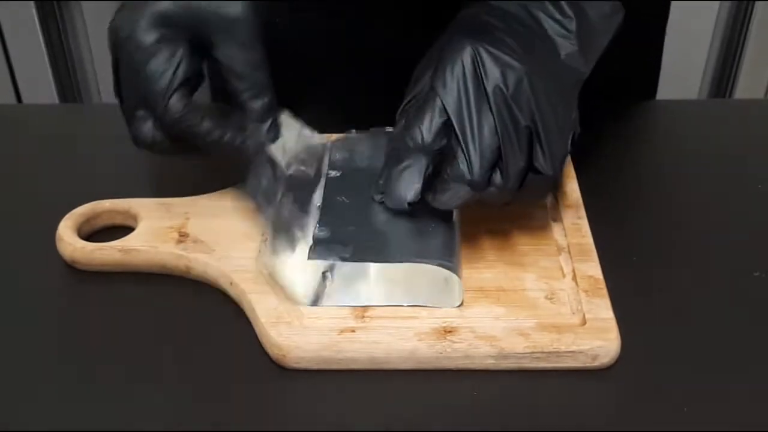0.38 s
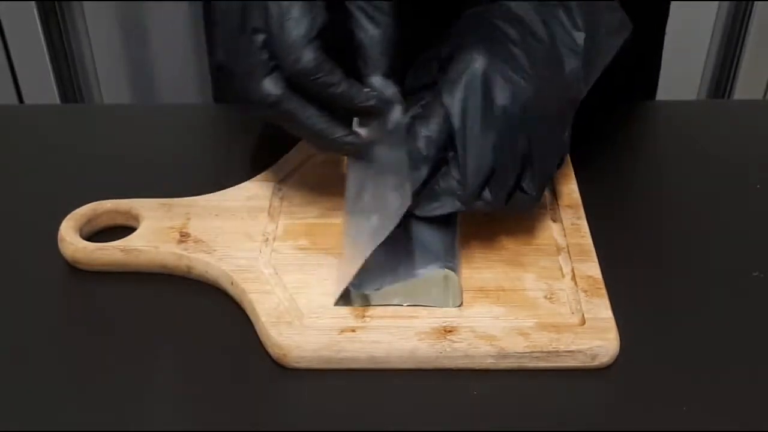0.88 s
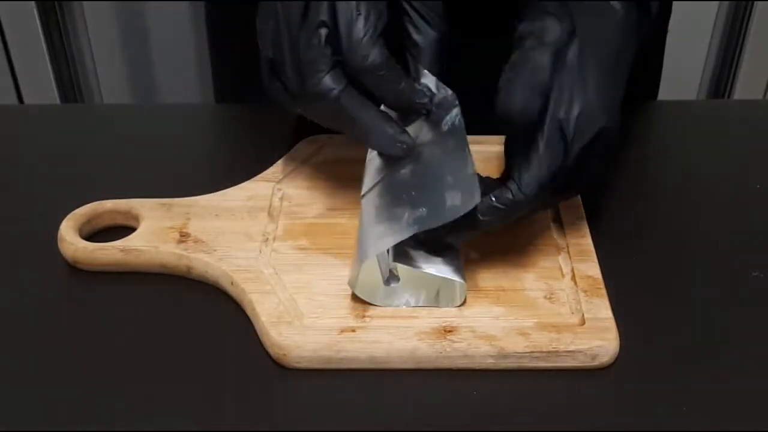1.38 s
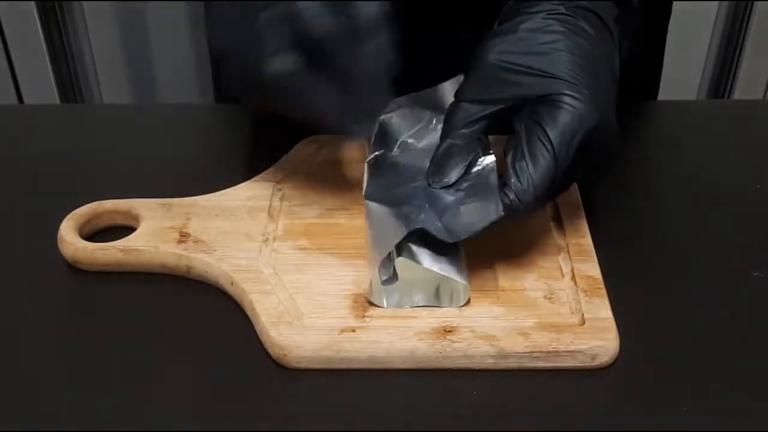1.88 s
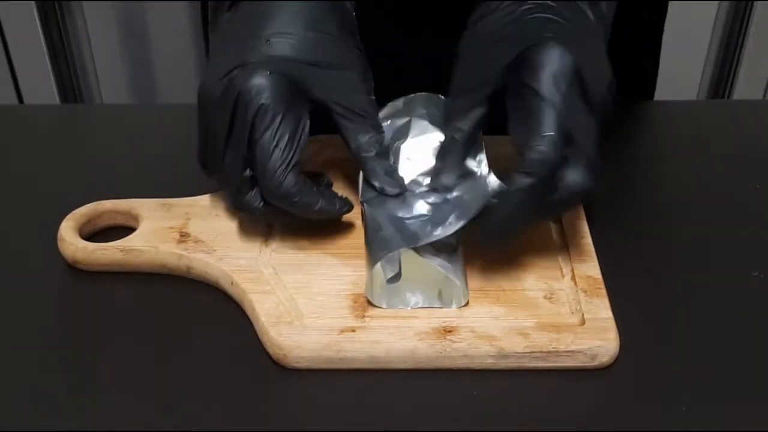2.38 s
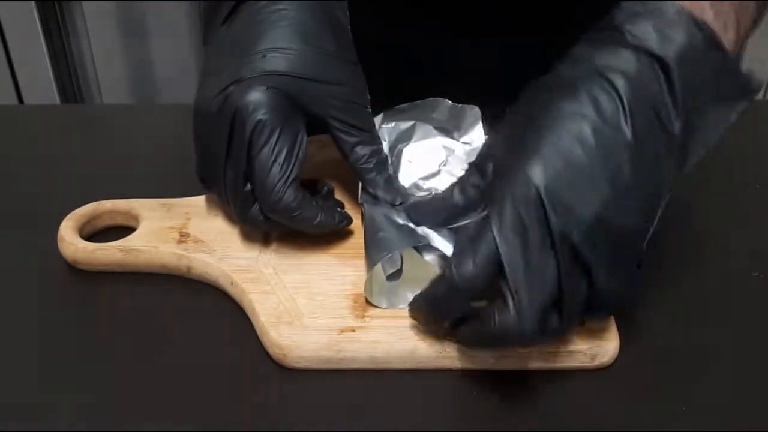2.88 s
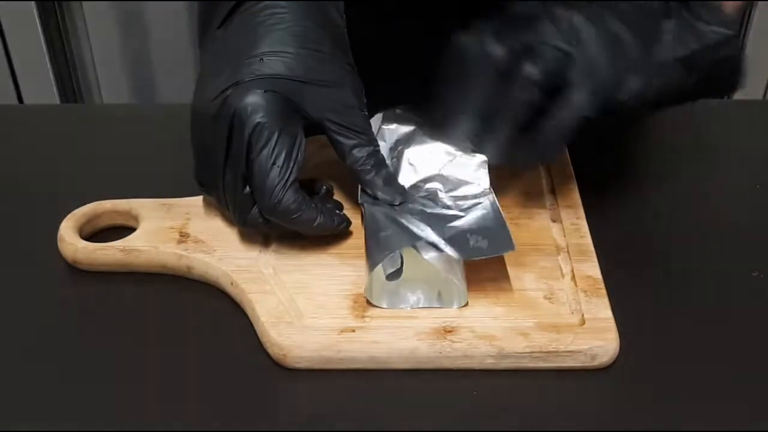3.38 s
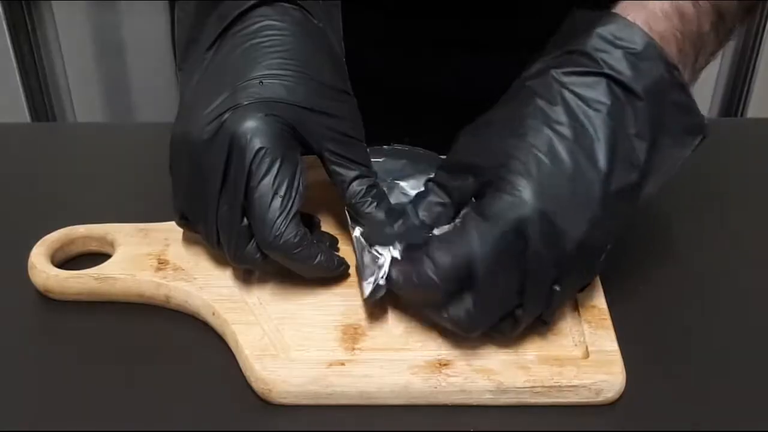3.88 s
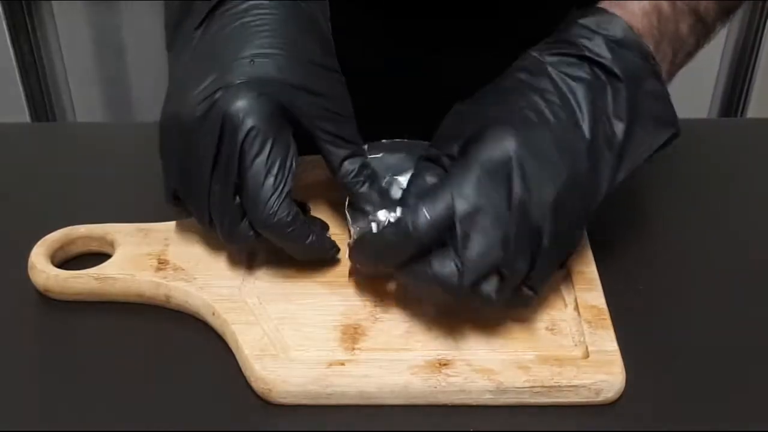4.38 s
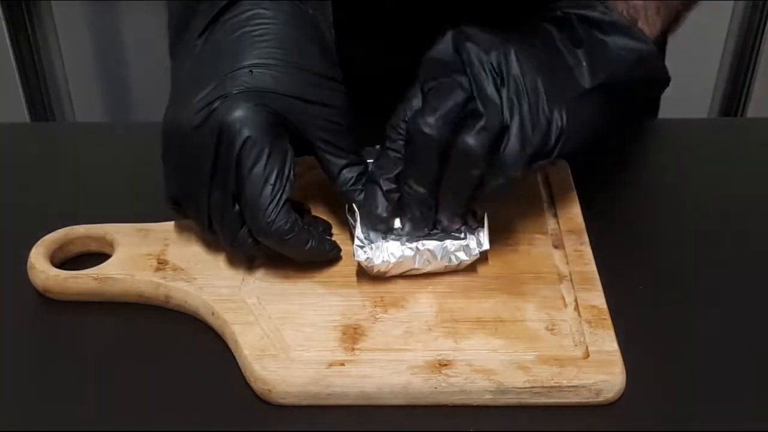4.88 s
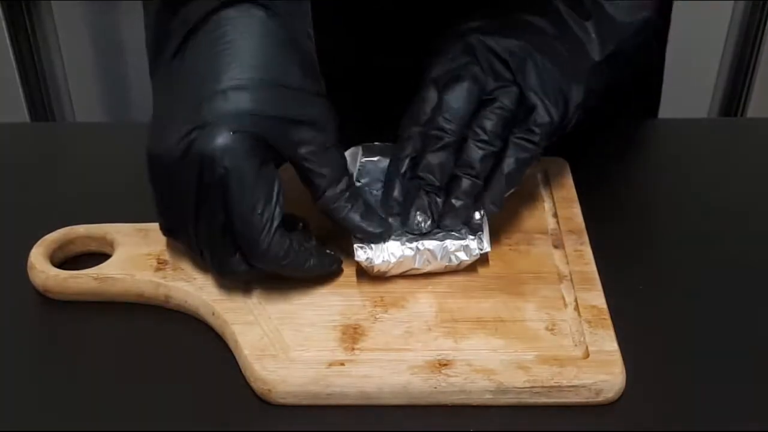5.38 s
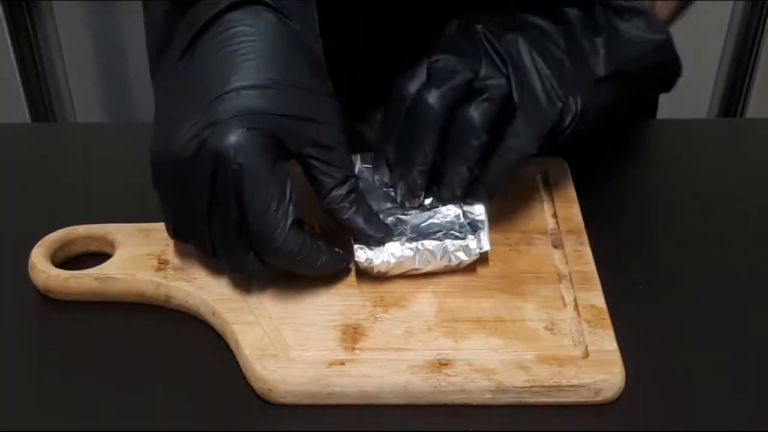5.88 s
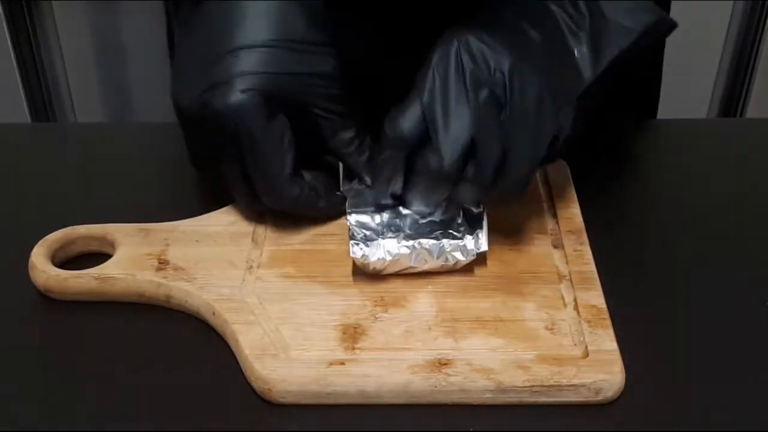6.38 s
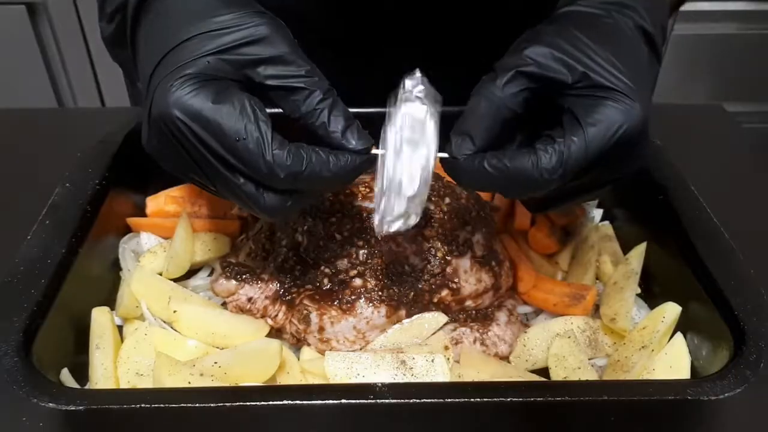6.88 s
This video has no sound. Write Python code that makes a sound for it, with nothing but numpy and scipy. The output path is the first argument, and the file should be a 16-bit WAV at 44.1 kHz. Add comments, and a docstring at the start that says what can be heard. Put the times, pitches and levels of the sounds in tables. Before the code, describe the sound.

A close, crisp stereo pickup of aluminium foil in a small kitchen, over a faint low appliance hum and soft room air. Soft rustling swells within the first 0.3 seconds into bright, irregular crinkles and sharp snaps, strongest around 0.6 to 1.6, with one hard dry crack at 1.14. After a dip just before 2 seconds, broader folds crackle from 2.1 to 2.9. Around 3.0 to 3.3 it nearly falls quiet, then bursts back at 3.35. From 3.6 to 4.9 dense creasing and tight snaps crowd together as the foil is folded and squeezed. From 5 to 6 the crackles are thinner, drier and more separated; a lull near 6.1 precedes a last flurry from 6.25. At 6.49 foil and reflections stop abruptly, leaving hum, slightly fuller airy background, a faint fading breathy resonance and tiny dry ticks near 6.63 and 6.72.

```python
"""Kitchen: gloved hands fold aluminium foil round a parcel on a wooden board.
Shaped noise bursts make creases snapping over a dense rustle; sprays and resonances add cracks and rings.
Near the end a cut to a quieter moment ends sound and reflections abruptly; faint dry handling follows
over a slightly fuller background. Appliance hum, deep rumble and room air are sines and filtered noise.
Two microphones a few centimetres apart: sound common to both reaches the left slightly sooner."""
import sys
import numpy as np
from scipy import signal
from scipy.fft import rfft, irfft
from scipy.io import wavfile

SR = 44100
rng = np.random.default_rng(int(sys.argv[2]) if len(sys.argv) > 2 else 0)


def unload_audio(sound):
    """Save the sound as a 16-bit wav file, at the path given as the first command line argument."""
    columns = np.transpose(np.atleast_2d(sound))
    # keep every value between -1 and 1, then stretch to whole-number steps
    steps = np.round(np.clip(columns, -1, 1) * 32767)
    wavfile.write(sys.argv[1], SR, steps.astype(np.int16))


def makeup_ratio(level_db):
    """Linear amplitude ratio for a level in decibels (20 dB per factor of ten)."""
    decades = np.asarray(level_db, float) / 20
    return 10 ** decades


N = 308700
LEFT_LEAD_SAMPLES = 4
CUT_S, HANDLING_AGAIN_S = 6.492, 6.615


def rms_one(x):
    """Scale to unit power over all channels."""
    return x / np.sqrt(np.mean(x ** 2) + 1e-20)


def at_hz(points, hz):
    """Read a spectrum table on a log-frequency axis."""
    point_hz, value = np.transpose(points)
    return np.interp(np.log(hz + 1), np.log(point_hz), value)


def sides(db):
    """Left and right gains for a left-right level difference."""
    return makeup_ratio(np.array([db / 2, -db / 2]))


def left_first(left, right):
    """Stereo pair whose right side arrives late by the microphone spacing."""
    return np.array([left, np.roll(right, LEFT_LEAD_SAMPLES)])


def pair(alike):
    """Two noises; the power share 'alike' is common to both and reaches the left first."""
    common, left, right = rng.standard_normal((3, N))
    shared = left_first(common, common)
    return np.sqrt(alike) * shared + np.sqrt(1 - alike) * np.array([left, right])


def resonate(x, hz, width_hz):
    """One two-pole resonance, gain about 1 on top."""
    r = np.exp(-np.pi * width_hz / SR)
    b = [(1 - r * r) / 2, 0, (r * r - 1) / 2]
    return signal.lfilter(b, [1, -2 * r * np.cos(2 * np.pi * hz / SR), r * r], x)


# Registers of the sheet, boom to sizzle. Each row: low edge in Hz, high edge in Hz,
# power share common to both microphones (0-1), left-right difference in dB.
REGISTERS = [(367, 974, 0.73, -2.5), (893, 1917, 0.63, -2.1), (2000, 4200, 0.3, -2), (4180, 8330, 0.2, 1.5),
             (8640, 13180, 0.029, 1)]
# Colour of the sheet. Each row: frequency in Hz, relative level in dB.
FOIL_COLOUR = [(240, 2), (400, -10.5), (480, -12), (840, -16), (1350, -10), (2500, -1), (4900, -4),
               (7600, -1.5), (9100, -9), (11000, -3.5), (13000, -3.5), (15000, 13.5), (16000, 23)]


def foil():
    """Noise bursts shaped by rustle and snaps, with plinks among them, excite each register of the sheet."""
    level_db = handling()
    grains = rustle(per_s=410, spread_db=3.0, colour_db=4.0, t60_s=0.071, bed=0.21)
    ticks = rustle(per_s=250, spread_db=4.5, colour_db=3.0, t60_s=0.0047, bed=0)
    grains = 0.86 * grains + 0.13 * ticks
    loud = snaps(rise_s=0.0011, crack_t60_s=0.02, flurry_t60_s=0.12, flurry_db=-12.5,
                 body_db=-25, crackle_db=-12.0, sizzle_trim_db=-2.0, lean_db=3.5)
    small = makeup_ratio(-15.0) * plinks(per_s=400, spread_db=5.0, cycles=37)
    hz, out = np.fft.rfftfreq(N, 1 / SR), 0
    colour = makeup_ratio(at_hz(FOIL_COLOUR, hz))
    for k, (low_hz, high_hz, alike, lean_db) in enumerate(REGISTERS):
        level = makeup_ratio(level_db[k]) * sides(lean_db)[:, None]
        roughness = np.clip(0.51 + 0.79 * ticks[k], 0, 2)
        power = level ** 2 * grains[k] + loud[k] * roughness
        burst = pair(alike) * np.sqrt(power) + level * small
        band = signal.butter(3, [low_hz, high_hz], "band", fs=SR, output="sos")
        # divide out the gain of band and colour together
        shape = np.abs(signal.sosfreqz(band, hz[::50], fs=SR)[1]) * colour[::50]
        out = out + signal.sosfilt(band, burst) / np.sqrt(np.mean(shape ** 2))
    return irfft(rfft(out) * colour, N) + panels(kick_t60_s=0.026, sharpness=7.0)


# Each grip, fold or squeeze sets the sheet crackling. Each row: time of full strength in s,
# crackle level in dB, rise in s, hold in s, fade in dB per s.
GRIPS = [(0.01, -62.5, 0.056, .05, 100), (0.072, -53.5, 0.037, 0.1, 110),
         (0.321, -42.5, 0.068, 0.0055, 111), (0.386, -46.5, .05, 0.23, 200),
         (0.628, -42.5, .005, 0.093, 82), (0.775, -46, .005, 0.0089, 99), (0.888, -49.5, .005, .03, 62),
         (0.937, -43, 0.06, .005, 99), (1.04, -49, .005, 0.0042, 110), (1.137, -43.5, 0.0044, .005, 110),
         (1.233, -44, 0.013, .005, 99), (1.525, -47.5, 0.32, 0.13, 102), (1.701, -43, 0.083, .005, 177),
         (1.79, -59, 0.084, 0.084, 53), (2.159, -46.5, 0.026, .005, 65), (2.328, -48, 0.011, .14, 122),
         (2.58, -49, 0.042, .005, 163), (2.714, -50.5, .005, .02, 89), (2.755, -45.5, 0.058, .005, 122),
         (2.913, -50.5, 0.0061, .005, 158), (3.13, -71.5, 0.09, 0.022, 54), (3.344, -53.5, .008, .02, 100),
         (3.367, -44, 0.026, 0.028, 138), (3.597, -47, 0.01, 0.11, 49), (3.78, -48.5, 0.063, .005, 72),
         (4.004, -47.5, .005, 0.029, 160), (4.14, -58.5, 0.086, 0.065, 100),
         (4.215, -47.5, .007, .003, 602), (4.336, -52.5, 0.07, 0.063, 47), (4.425, -56.5, 0.53, .005, 38),
         (4.581, -53, .005, 0.033, 35), (4.713, -49, 0.37, .005, 21), (5.351, -46, 0.038, .003, 220),
         (5.459, -56.5, .04, .05, 50), (5.56, -54.5, 0.0091, .005, 83), (5.755, -51.5, 0.021, .03, 68),
         (5.815, -50.5, 0.066, 0.011, 80), (6.06, -56.5, .007, .003, 228), (6.23, -63, 0.075, 0.024, 58),
         (6.369, -50.5, 0.26, 0.0055, 152), (6.49, -65, 0.034, .01, 404), (6.636, -77, .01, .003, 350),
         (6.733, -75.5, .1, .005, 68)]
# Registers against the crackle; the tighter the parcel, the thinner its body.
# Each row: time in s, boom in dB, low body in dB, sizzle in dB.
REGISTER_BALANCE = [(0, -19, -9.5, 0.5), (0.2, -11, -3, 4), (0.33, -21, -13.5, -2), (0.62, -22, -8, 0),
                    (0.78, -15, -5, -2), (1.1, -12, -4, 3.5), (1.45, -9, -4.5, -2), (1.75, -9, -1.5, 2),
                    (2.05, -14.5, -4.5, -2), (2.2, -12, -6.5, 2.5), (2.9, -13.5, -5, 3.5),
                    (3.1, -14, -12, -3), (3.4, -6, -4, 3), (3.6, -18.5, -7, -0.5), (3.78, -23, -15, -2),
                    (4.03, -24, -8, 0.5), (4.23, -27, -12, 1), (4.44, -11, -3, 2.5), (4.7, -20, -6, 0.5),
                    (5.1, -14.5, -16, 3), (5.3, -22, -20.5, 0.5), (5.7, -22, -21.5, 0.5),
                    (5.8, -10.5, -3, 0.5), (6.05, -19.5, -26.5, 2), (6.38, -17, -6, 2.5),
                    (6.5, -16, -14, 1), (7, -5, -8, 6)]
# High body beyond its share of the low body. Each row: time in s, level in dB.
HIGH_BODY = [(0, 7.5), (0.1, 2), (0.3, -2), (0.95, 2), (1.4, 0.5), (2, -1.5), (2.8, 1.5), (3.2, -4),
             (3.6, 2), (4.1, 5), (4.6, 0.5), (5.2, 3), (5.6, 2.5), (5.85, 3), (6.1, -5), (6.4, 6.5),
             (6.55, 0), (7, 1)]
# Share of the crackle's swing about its usual level that each register follows: one number each, boom to sizzle.
FOLLOWS = [0.51, 0.6, 0.85, 1, 1.3]
RISE_DB, RESTING_DB, USUAL_DB = 19.5, -111, -51
HIGH_BODY_SHARE = 0.37


def handling():
    """Level in dB per register: grips rise, hold and fade; the registers follow their summed crackle."""
    now = np.arange(0, N, 32) / SR
    s, full_db, rise_s, hold_s, fade_db_per_s = np.transpose(GRIPS)[:, :, None]
    climb_db = RISE_DB * np.maximum(s - now, 0) / rise_s
    fall_db = fade_db_per_s * np.maximum(now - s - hold_s, 0)
    grip_power = makeup_ratio(2 * (full_db - climb_db - fall_db))
    crackle_db = 10 * np.log10(np.sum(grip_power, axis=0) + makeup_ratio(2 * RESTING_DB))
    at_s, *columns = np.transpose(REGISTER_BALANCE)
    boom, low_body, sizzle = [np.interp(now, at_s, c) for c in columns]
    high_body = np.interp(now, *np.transpose(HIGH_BODY)) + HIGH_BODY_SHARE * low_body
    levels = []
    for share, against_db in zip(FOLLOWS, [boom, low_body, high_body, 0, sizzle]):
        register_db = USUAL_DB + share * (crackle_db - USUAL_DB) + against_db
        levels.append(np.interp(np.arange(N) / SR, now, register_db))
    return levels


def rustle(per_s, spread_db, colour_db, t60_s, bed):
    """Power envelope per register of tiny creases: random times, few large, each coloured differently."""
    born = rng.random(N) < per_s / SR
    size_db = spread_db * np.minimum(rng.exponential(1, N), 4)
    register_db = colour_db * rng.standard_normal((len(REGISTERS), N))
    kicks = born * makeup_ratio(2 * (size_db + register_db))
    power = signal.lfilter([1], [1, -makeup_ratio(-120 / (t60_s * SR))], kicks)
    return bed + (1 - bed) * power / power.mean(axis=1, keepdims=True)


# Buckling creases. Each row: start in s, level in dB, pitch of the panel set ringing in Hz,
# panel in dB and sizzle in dB relative to the level.
SNAPS = [(0.0498, -43, 1300, 5.5, -18), (0.076, -27.5, 1430, -10.5, -16), (0.1826, -27, 1590, -10, -9),
         (0.2867, -24, 2310, -32, -6), (0.3116, -23.5, 2620, -31, -3), (0.377, -34, 2470, -21, -12),
         (0.4339, -28, 2740, -36, -13), (0.509, -29, 2700, -16, -5), (0.63, -19, 2200, -30, -5),
         (0.6963, -25, 2590, -18, -12), (0.7232, -22, 2150, -11, -2), (0.7746, -20.5, 1690, -11.5, -6),
         (0.822, -25, 1610, -28, -2), (0.879, -24, 2190, -24, 0.5), (0.9177, -28, 2300, -7, -2),
         (0.9372, -23, 2080, -8, -7), (1.04, -26, 2570, -25, 1.5), (1.139, -31, 2320, -9, -9),
         (1.2373, -24.5, 2410, -10, -1), (1.257, -27, 2600, -7, -8), (1.3144, -34, 2250, -28, 5),
         (1.3773, -27, 2010, -25, -26), (1.445, -26, 910, -18, -10), (1.508, -33, 2330, -9, 0),
         (1.5558, -20, 1340, -24, 0), (1.636, -26, 3440, -5.5, -5), (1.692, -23.5, 1380, -15, -35),
         (1.81, -34, 2260, -15, 1), (1.856, -23.5, 2330, -15, -8), (2.134, -31.5, 1870, -10.5, -10),
         (2.149, -20.5, 2100, -22, -16), (2.1904, -27.5, 2160, -6, -1), (2.3233, -21.5, 1360, -14, -7),
         (2.393, -27.5, 1340, -10.5, -9), (2.426, -21, 2500, -12, -18), (2.4834, -25.5, 1810, -9, -7),
         (2.5688, -26.5, 1640, -21, 0.5), (2.715, -24, 1830, -20, -3), (2.7496, -18.5, 2000, -12.5, -5.5),
         (2.806, -26, 1860, -8.5, -2), (2.915, -28, 2400, -8, 0), (3.1, -49, 2500, -15, -25),
         (3.199, -44, 923, -22, -33), (3.35, -32, 1330, -17, -3), (3.3643, -24.5, 2600, -9, -4),
         (3.389, -29.5, 2530, 1.5, -13), (3.589, -29, 2500, -21, -2), (3.601, -25, 2500, -9, -8),
         (3.62, -23, 2660, -17, -6.5), (3.666, -38, 2770, -4, -10), (3.797, -29, 2680, -16, -12),
         (3.848, -23.5, 1900, -10.5, -5.5), (3.925, -33.5, 3010, -28, 2), (4.0005, -27, 1990, -8.5, -17),
         (4.0497, -20.5, 1750, -12, -9), (4.115, -28.5, 2500, -5.5, -11), (4.1825, -31, 2580, -15, -6),
         (4.211, -27, 2380, -23, -13), (4.2294, -27, 2500, -7, -11), (4.2584, -26.5, 2360, -10, -10),
         (4.322, -20.5, 2380, -21, -11), (4.385, -26, 2500, -13, -7), (4.395, -25, 2470, -7, -5),
         (4.4461, -21.5, 1030, -18, -13), (4.4906, -25, 1560, -29, -9), (4.544, -24.5, 1880, -16, -8.5),
         (4.586, -26.5, 1850, -22, -3), (4.623, -23.5, 1490, -9.5, -6.5), (4.6533, -22.5, 3320, -21, -16),
         (4.689, -25.5, 2960, -12, -7), (4.7177, -31, 3070, 1, -23), (4.7521, -26.5, 1450, -5.5, -21),
         (4.8297, -26.5, 2900, -24, -7), (4.904, -26.5, 2260, -14, -6), (4.9571, -27, 3880, -24, -16),
         (5.15, -33, 2920, -14, -17), (5.1875, -30, 3930, -13, -5.5), (5.219, -36.5, 2700, -2, -1),
         (5.2814, -26, 2850, -29, -11), (5.3355, -23.5, 2900, -10, -12), (5.462, -28, 3980, -13, -12),
         (5.481, -28.5, 2540, -15.5, -8), (5.5537, -27, 3870, -21, -6), (5.5826, -24, 3470, -12.5, -9),
         (5.743, -32, 2880, -24, -1), (5.7682, -23.5, 2260, -17.5, -4.5), (5.8132, -25.5, 2240, -6.5, -7),
         (5.9562, -33.5, 3940, -8, -15), (5.9934, -37, 2360, -11, -9), (6.0546, -28, 3700, -41, -10),
         (6.0736, -49, 3640, -34, -15), (6.1564, -43.5, 1210, -22, 0), (6.2052, -36, 3950, -23, -7),
         (6.273, -25.5, 2400, -14.5, -8), (6.303, -25, 2400, -16, -15), (6.3607, -25, 2290, -19, -16),
         (6.3886, -27, 1400, -10.5, -9), (6.4457, -27.5, 2640, -11, -16), (6.721, -44, 2500, -12, -22)]


def snaps(rise_s, crack_t60_s, flurry_t60_s, flurry_db, body_db, crackle_db, sizzle_trim_db, lean_db):
    """Power envelope (register, side, time) of loud creases: a sharp crack, then a fading flurry of neighbours."""
    out, age = np.zeros((len(REGISTERS), 2, N + SR)), np.arange(SR // 6) / SR
    rise = 1 - np.exp(-age / rise_s)
    fade = rise * (makeup_ratio(-120 * age / crack_t60_s) + makeup_ratio(2 * flurry_db - 120 * age / flurry_t60_s))
    for s, snap_db, _, panel_db, sizzle_db in SNAPS:
        i, body = round(s * SR), panel_db + body_db
        levels = makeup_ratio(snap_db + np.array([body - 8, body, body, crackle_db, sizzle_db + sizzle_trim_db]))
        power = np.outer(levels, sides(lean_db)) ** 2
        out[:, :, i:i + len(age)] += power[:, :, None] * fade
    return out[:, :, :N]


def panels(kick_t60_s, sharpness):
    """Each snap kicks the flat panel beside the crease, which rings briefly at its own pitch."""
    out, size = np.zeros(N + SR), SR // 10
    kicks = rng.standard_normal((len(SNAPS), size)) * makeup_ratio(-60 * np.arange(size) / SR / kick_t60_s)
    for kick, (s, snap_db, hz, panel_db, _) in zip(kicks, SNAPS):
        ping, i = resonate(kick, hz, hz / sharpness), round(s * SR)
        out[i:i + size] += ping * makeup_ratio(snap_db + panel_db) / np.abs(ping).max()
    return left_first(out[:N], out[:N])


def plinks(per_s, spread_db, cycles):
    """Small panels of every size ring at random as the sheet shifts; unit power."""
    born = rng.random(N) < per_s / SR
    sizes = born * makeup_ratio(spread_db * np.minimum(rng.exponential(1, N), 4))
    pitches_hz, dealt = np.geomspace(900, 9000, 20), rng.integers(0, 20, N)
    out = 0
    for k, hz in enumerate(pitches_hz):
        ping = resonate(sizes * (dealt == k) + 1e-18, hz, 0.86 * hz / cycles) / np.sqrt(hz)
        out = out + np.outer(sides(rng.normal(0, 9.2)), ping)
    return rms_one(left_first(*out))


# Single dry cracks, bright and over at once. Each row: start in s, level in dB.
CRACKS = [(0.076, -28), (0.0844, -40), (0.2399, -40), (0.2635, -32), (0.8789, -29), (1.1408, -17),
          (1.1864, -37), (1.3155, -29), (1.3773, -38), (1.695, -30), (1.8108, -43), (1.8367, -40),
          (2.5681, -32), (2.9154, -39), (3.1991, -60), (3.983, -45), (4.003, -29), (4.0164, -30),
          (4.0334, -30), (4.0493, -26), (4.1155, -31), (4.1734, -45), (4.1819, -35), (4.2118, -23),
          (4.2402, -30), (4.313, -33), (4.3494, -32), (5.0194, -34), (5.0664, -37), (5.0913, -42),
          (5.1213, -41), (5.1494, -38), (5.1981, -40), (5.257, -37), (5.3303, -36), (5.461, -31),
          (5.5144, -39), (5.5318, -43), (5.5528, -24.5), (5.5835, -30), (5.5924, -42), (5.7683, -30),
          (5.9948, -44), (6.056, -28), (6.0747, -33), (6.1569, -50), (6.2422, -38), (6.282, -31),
          (6.3604, -33.5), (6.4465, -33.5), (6.6248, -54), (6.7226, -55)]
CRACK_T60_S, CRACK_LOW_HZ, CRACK_HZ, CRACK_WIDTH_HZ = 0.0036, 4000, 7300, 2700


def cracks():
    """A crease flips in one go: a very short spray of noise, ringing broadly in the treble."""
    out, size = np.full((2, N + SR), 1e-18), SR // 50
    fade = makeup_ratio(-60 * np.arange(size) / SR / CRACK_T60_S)
    sprays = rng.standard_normal((len(CRACKS), 2, size)) * fade
    high_pass = signal.butter(2, CRACK_LOW_HZ, "high", fs=SR, output="sos")
    for spray, (s, crack_db) in zip(sprays, CRACKS):
        ringing = resonate(spray, CRACK_HZ, CRACK_WIDTH_HZ) + 0.21 * spray
        bright = signal.sosfilt(high_pass, ringing)
        bright /= np.abs(bright).max(axis=1, keepdims=True)
        i = round(s * SR)
        out[:, i:i + size] += makeup_ratio(crack_db) * sides(2.0)[:, None] * bright
    return out[:, :N]


# Parcel knocks the board. Each row: start in s, level in dB.
KNOCKS = [(1.143, -53), (3.389, -49.5), (5.78, -63.5), (6.39, -73)]
# Modes of the board. Each row: frequency in Hz, relative level in dB, t60 in s.
BOARD = [(255, -0.96, .12), (401, -0.5, 0.21), (452, 0.55, 0.098), (504, -1.3, 0.14)]


def knocks():
    """Each knock sets every board mode ringing with a strength of its own."""
    out = np.zeros(N)
    at_s, knock_db = np.transpose(KNOCKS)
    at = np.round(at_s * SR).astype(int)
    for hz, mode_db, t60_s in BOARD:
        clicks = np.full(N, 1e-18)
        clicks[at] = makeup_ratio(knock_db + mode_db + rng.normal(0, 0.62, len(at)))
        r, w = makeup_ratio(-60 / (t60_s * SR)), 2 * np.pi * hz / SR
        out += signal.lfilter([0, np.sin(w)], [1, -2 * r * np.cos(w), r * r], clicks)
    return out


def kitchen(x):
    """Diffuse reflections: a dying, dulled noise tail, different for each side."""
    t60_s, level_db = 0.24, -8.5
    age = np.arange(SR // 2) / SR
    tail = rng.standard_normal((2, len(age))) * makeup_ratio(-60 * age / t60_s) * (age > .003)
    tail = signal.lfilter([1], [1, -.3], tail)
    tail /= np.sqrt(np.sum(tail ** 2, axis=1, keepdims=True))
    return makeup_ratio(level_db) * signal.fftconvolve(x, tail, axes=1)[:, :N]


# Faint breathy rings. Each row: start in s, end in s, level in dB, frequency in Hz,
# width of each resonance pass in Hz, t60 in s.
RINGS = [(1.8, 3.4, -72, 1540, 200, 23), (6.493, 7, -61, 1690, 260, 0.59)]


def rings():
    """Noise in one resonance, applied twice, starting at once, dying away and silenced at its end."""
    out, now = 0, np.arange(N) / SR
    for start_s, end_s, level_db, hz, width_hz, t60_s in RINGS:
        tone = rms_one(resonate(resonate(pair(0.41), hz, width_hz), hz, width_hz))
        fade = makeup_ratio(level_db - 60 * np.maximum(now - start_s, 0) / t60_s)
        out = out + tone * (now > start_s) * (now < end_s) * fade
    return out


# Appliance partials. Each row: frequency in Hz, level in dB, width of each resonance pass in Hz,
# steady power share (0-1).
HUM = [(86.6, -69.5, 3, 0.03), (101.7, -66.5, 4, 0.93), (125.4, -67.5, 15, 0), (149.6, -63, 7.6, 0.5),
       (167.1, -57.5, 4.8, 0.38), (217.4, -69, 7.5, 0.11), (263.3, -62.5, 2.8, 0.81), (322.6, -74.5, 5, 0)]


def hum():
    """Each partial is a steady sine plus noise through a narrow resonance applied twice, so it wavers."""
    out = np.zeros(N)
    for hz, level_db, width_hz, steady in HUM:
        noise = rng.standard_normal(N + SR)
        waver = resonate(resonate(noise, hz, width_hz), hz, width_hz)[SR:]  # build-up dropped
        sine = np.sqrt(2) * np.sin(2 * np.pi * (hz * np.arange(N) / SR + rng.random()))
        out += makeup_ratio(level_db) * (np.sqrt(steady) * sine + np.sqrt(1 - steady) * rms_one(waver))
    return left_first(out, out) * sides(-6.5)[:, None]


# Deep rumble. Each row: time in s, level in dB.
RUMBLE = [(0, -82), (1.2, -71), (4.9, -71), (5.2, -90), (7, -78)]


def rumble():
    """A deep band of noise, a resonance applied twice, that comes through the worktop."""
    hz, width_hz = 38.2, 5.6
    level_db = np.interp(np.arange(N) / SR, *np.transpose(RUMBLE))
    noise = resonate(resonate(pair(0.52), hz, width_hz), hz, width_hz)
    return makeup_ratio(level_db) * rms_one(noise) * sides(-10.0)[:, None]


# Room air and microphone hiss. Each row: frequency in Hz, relative level in dB.
AIR = [(20, -17), (43, -18), (91, -10.5), (151, 2.5), (211, -9), (272, -12), (450, -20.5), (700, -30.5),
       (1000, -28), (1500, -35), (2500, -58), (4600, -42), (9000, -43.5), (16000, -38.5)]
# Each row: frequency in Hz, left-right correlation (-1 to 1).
AIR_LIKENESS = [(60, 0.98), (240, 0.72), (950, -0.29), (3770, -0.49), (15000, 0.091)]
# Each row: frequency in Hz, left-right difference in dB.
AIR_BALANCE = [(60, 4), (240, -6.5), (950, -4), (3770, 2), (15000, -3)]


def air():
    """Steady coloured noise: alike on both sides in the bass, partly opposed higher up, unrelated at the top."""
    level_db = -58
    hz = np.fft.rfftfreq(N, 1 / SR)
    mid, side = rfft(rng.standard_normal((2, N)))
    alike = at_hz(AIR_LIKENESS, hz)
    both = np.sqrt(1 + alike) * mid + np.sqrt(1 - alike) * side * [[1], [-1]]
    coloured = both * makeup_ratio(at_hz(AIR, hz)) * sides(at_hz(AIR_BALANCE, hz))
    return makeup_ratio(level_db) * rms_one(irfft(coloured, N))


# Fuller background of the quieter moment. One row: low edge in Hz, high edge in Hz, level in dB rms.
LATER_AIR = (410, 1400, -76)


def later_air():
    """A soft band of steady noise added to the background from the cut on."""
    low_hz, high_hz, level_db = LATER_AIR
    band = signal.butter(1, [low_hz, high_hz], "band", fs=SR, output="sos")
    noise = rms_one(signal.sosfilt(band, pair(0.15)))
    return makeup_ratio(level_db) * noise * (np.arange(N) > CUT_S * SR)


def scene():
    """Foil and board in the room until the cut, then dry after a short gap; hum and air throughout."""
    near = foil() + cracks() + knocks()
    now = np.arange(N) / SR
    before_cut = now < CUT_S
    moving = before_cut | (now > HANDLING_AGAIN_S)
    handled = moving * near + before_cut * kitchen(near)
    return handled + rings() + hum() + rumble() + air() + later_air()


def top_cut(x):
    """Nothing passes above the cut-off."""
    return signal.sosfilt(signal.butter(12, 17000, fs=SR, output="sos"), x)


def record(dry):
    """A steep low-pass, 45 dB down from 16.1 kHz, takes off the top."""
    low_pass = signal.cheby2(14, 45, 16100, fs=SR, output="sos")
    mix = signal.sosfilt(low_pass, dry)
    return top_cut(mix)


dry = scene()
out = record(dry)
unload_audio(out)
```